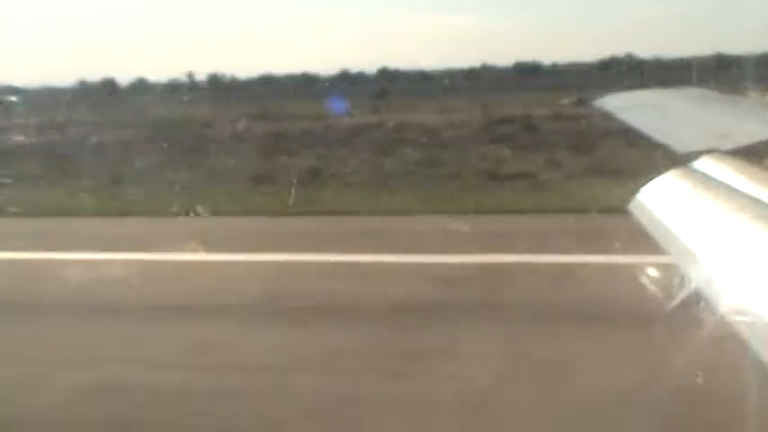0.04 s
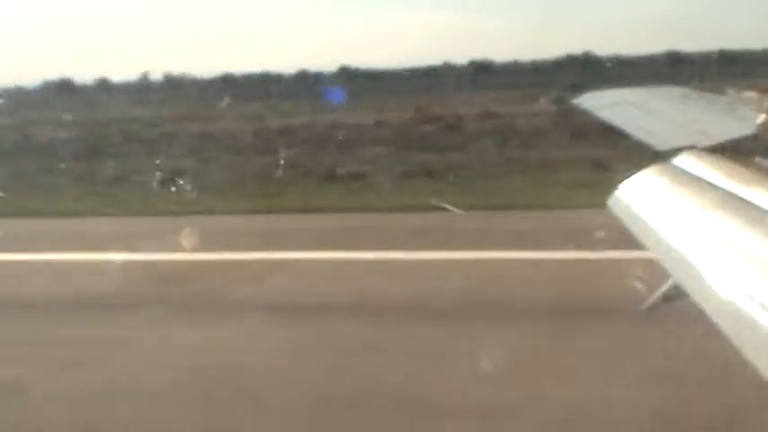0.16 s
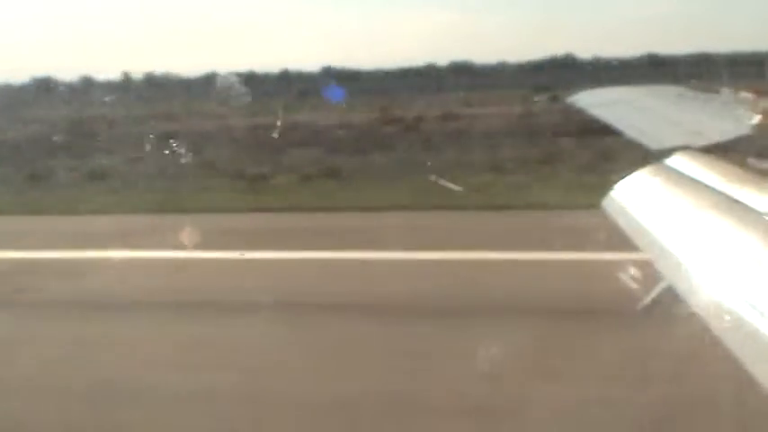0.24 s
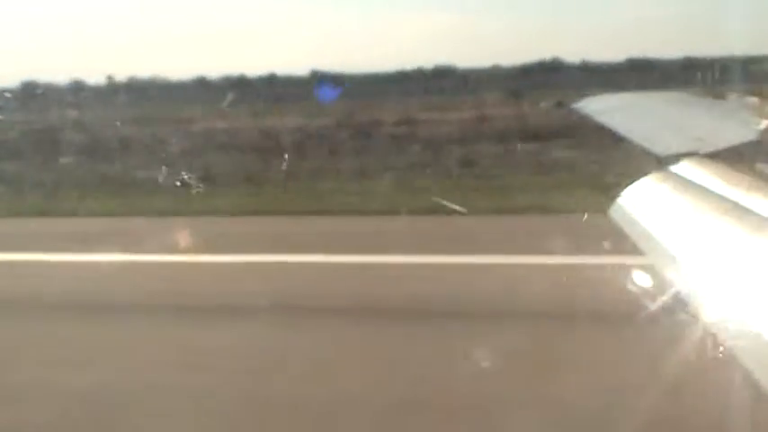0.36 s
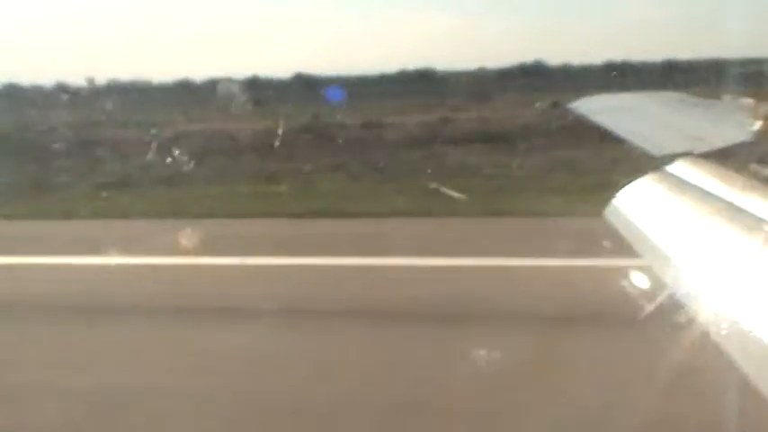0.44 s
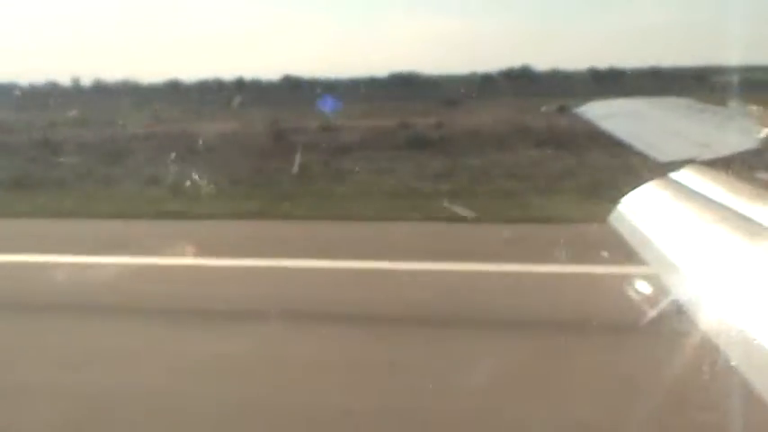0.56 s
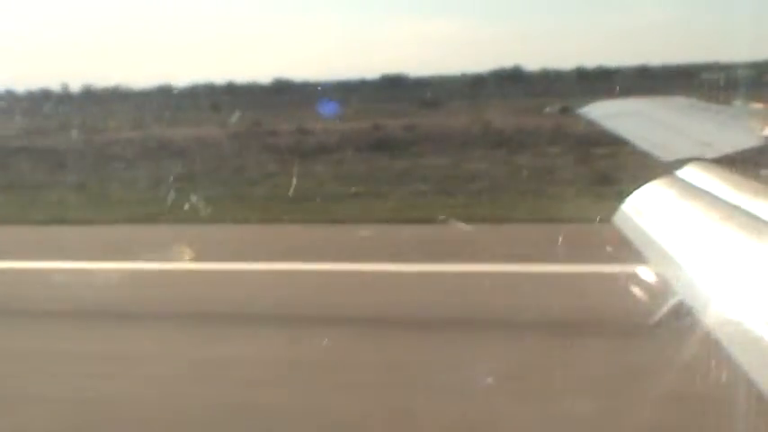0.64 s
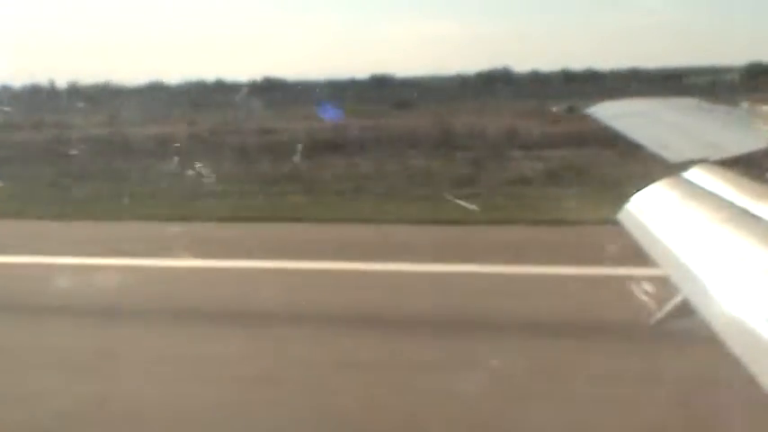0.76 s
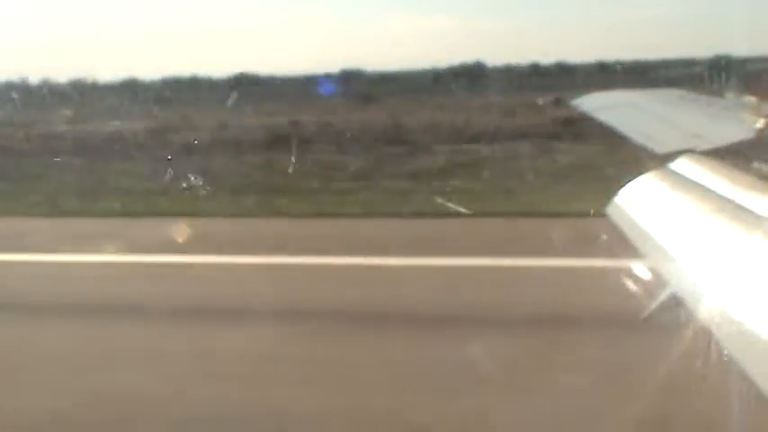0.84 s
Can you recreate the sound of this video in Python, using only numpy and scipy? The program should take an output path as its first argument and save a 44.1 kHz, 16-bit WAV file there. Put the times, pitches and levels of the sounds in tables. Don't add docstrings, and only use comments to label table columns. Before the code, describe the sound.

Aircraft cabin roar during the landing run, distorted and booming, with bumps and rattling trim

```python
import sys
import numpy as np
from scipy import signal
from scipy.fft import rfft, irfft
from scipy.io import wavfile
from scipy.ndimage import uniform_filter1d

SR = 44100
rng = np.random.default_rng(int(sys.argv[2]) if len(sys.argv) > 2 else 0)


def to_wav(s):
    ch = np.atleast_2d(s).T
    pcm = np.round(np.clip(ch, -1, 1) * 32767)
    wavfile.write(sys.argv[1], SR, pcm.astype(np.int16))


def ratio(d):
    e = np.asarray(d, float) / 20
    return 10 ** e


N = 144648

# start_s, level_db
ROLL = [
    (0, 2.5),
    (.4, 2),
    (.8, 1),
    (1.2, 0),
    (1.6, 1),
    (2.0, 1),
    (2.4, 0.5),
    (2.8, -0.5),
    (3.05, -2),
    (3.28, -4.5),
]
# pitch_hz, level_db (per Hz)
BOOM_COLOUR = [(25, -28), (50, -5), (130, -4.5), (260, -4.5), (420, -12.5), (800, -32.5), (1500, -44.5),
               (3000, -67)]
# pitch_hz, width_hz, boost_db
HULL_TONES = [(86.7, 20, 3.5), (167, 17, 3), (215.5, 30.4, 4.5), (314, 78, 0.9), (362.5, 11, 2),
              (850, 122, 11)]
# pitch_hz, level_db (per Hz)
HISS_COLOUR = [(300, 0), (1000, 1.5), (2000, -6.5), (3200, -14.5), (4700, -15.5), (7000, -23), (10000, -34),
               (16000, -57)]
# pitch_hz, likeness (0 to 1)
LIKENESS = [(60, 0.92), (250, 0.99), (500, 0.77), (1500, 0.88), (5000, 0.89), (12000, 0.3)]
# start_s, level_db (peak), pitch_hz
KNOCKS = [(0.0707, -21.5, 3680), (0.1974, -25, 3900), (0.213, -10.5, 3360), (0.403, -16.5, 3570),
          (0.5197, -10.5, 3320), (0.6224, -33, 3080), (0.7714, -20, 3550), (0.9276, -27, 3220),
          (0.9797, -23, 3500), (1.463, -29, 3140), (1.6576, -34, 3120), (1.8074, -35, 3170),
          (1.9308, -17.5, 5030), (2.0487, -23, 3260), (2.129, -37, 3000), (2.1794, -48, 3140),
          (2.2106, -41, 3160), (2.2714, -33, 3010), (2.398, -15.5, 3140), (2.441, -26, 3080),
          (2.5694, -35, 4540), (2.66, -32, 3100), (2.696, -34, 3070), (2.7514, -40, 3120),
          (3.205, -21, 3250)]
# low_cut_hz, turning_zero_hz, pole_hz, gain_db
PHASE_NETWORK = [
    (151, 185, 148, -4),
    (255, 423, 260, -2.5),
]
# start_s, level_db (peak)
BRIGHT_TICKS = [(0.2483, -43), (0.4015, -48), (0.5097, -42.5), (0.5494, -48), (0.622, -42), (0.9426, -42),
                (0.9896, -43.5), (1.125, -48), (1.6561, -46), (1.9294, -57), (2.121, -48), (2.176, -43.5),
                (2.2054, -45), (2.293, -45), (2.4394, -53.5), (2.5685, -43.5), (2.6539, -45),
                (2.699, -56.5), (2.7464, -47), (3.0285, -57)]
# start_s, shake_db, length_s
JOINTS = [(0.074, 4.5, 0.019), (0.134, 1, 0.013), (0.21, 2.5, 0.011), (0.409, 7.5, 0.013),
          (0.453, 3.5, 0.01), (0.523, 2, .02), (0.645, 6, .025), (0.773, 4, 0.011), (0.984, 5, 0.029),
          (1.112, 2.5, 0.013), (1.309, 3, .012), (1.38, 0, 0.018), (1.476, 5, .01), (1.668, 2.5, 0.03),
          (1.903, 4.5, 0.029), (2.274, 5.5, 0.021), (2.443, 2.5, 0.022), (2.504, 4.5, 0.023),
          (2.673, 6, 0.016), (2.821, 3.5, 0.011), (2.964, 2.5, 0.008), (3.038, 3.5, 0.01),
          (3.117, -0.5, .01), (3.174, 3, 0.0085), (3.209, 4.5, 0.028)]
# pitch_hz, level_db (per Hz)
SHAKE_COLOUR = [(300, -21), (700, -10), (1300, 3), (2500, -15.5), (5000, -20), (12000, -52.5)]
# start_s, level_db
DRONE_LEVEL = [(0, -20.5), (.3, -24), (.6, -20.5), (.9, -16), (1.1, -14), (1.3, -14.5), (1.55, -17.5),
               (1.85, -18), (2.15, -26), (2.47, -14.5), (2.75, -18), (3.05, -21.5), (3.28, -29)]
# start_s, level_db, pitch_hz
PANEL_RINGS = [(0.1, -20.5, 374), (0.11, -21, 324), (0.16, -27, 90.7), (0.21, -19.5, 211.8),
               (0.254, -23.5, 89), (0.299, -14.5, 240.5), (0.364, -17.5, 295.4), (0.399, -16.5, 215.3),
               (0.454, -22, 320), (0.554, -17.5, 311), (0.554, -19, 342), (0.624, -20, 224),
               (0.723, -17, 274), (0.798, -16, 212.6), (0.818, -21, 319), (0.888, -25, 174),
               (0.934, -26, 401.6), (0.964, -29, 346.5), (1.003, -16, 205.5), (1.083, -21, 220.7),
               (1.172, -19.5, 305), (1.222, -21.5, 322.6), (1.272, -17.5, 160.7), (1.312, -19.5, 224.3),
               (1.367, -15, 303.2), (1.396, -17.5, 208.6), (1.432, -19, 303.2), (1.502, -17.5, 202.7),
               (1.591, -21.5, 88), (1.651, -19.5, 214.3), (1.701, -20, 154.2), (1.791, -19, 219),
               (1.851, -17.5, 351.2), (2.029, -17.5, 212.7), (2.085, -15.5, 230.7), (2.109, -20.5, 160.7),
               (2.155, -21.5, 298.3), (2.175, -17.5, 223), (2.28, -18.5, 224), (2.3, -17, 290.5),
               (2.34, -20, 348), (2.37, -20, 230), (2.41, -23, 355), (2.465, -21, 313), (2.479, -17, 181.4),
               (2.539, -23, 353.5), (2.629, -22, 307.5), (2.739, -19.5, 183), (2.809, -20.5, 217.5),
               (2.879, -20.5, 325.6), (2.898, -22.5, 231.5), (2.983, -21.5, 241.6), (3.068, -23.5, 155),
               (3.128, -23, 279), (3.162, -23.5, 155), (3.203, -21.5, 304.4)]

HISS_FOLLOWS = 1.42


def evened(x):
    return x / np.sqrt(np.mean(x ** 2) + 1e-20)


def read(points, hz):
    pitch, value = np.transpose(points)
    return np.interp(np.log(hz + 1), np.log(pitch + 1), value)


def roll_db():
    return np.interp(np.arange(N) / SR, *np.transpose(ROLL))


def joint_db():
    t = np.arange(N) / SR
    return sum(db * np.exp(-((t - start) / length) ** 2) for start, db, length in JOINTS)


def drift(low_hz, top_hz):
    t = np.arange(0, N + 64, 64) / SR
    waver = 0
    for hz in np.geomspace(low_hz, top_hz, num=24):
        waver = waver + np.sin(2 * np.pi * (hz * t + rng.random())) / np.sqrt(hz)
    return np.interp(np.arange(N) / SR, t, evened(waver))


def pair(x, colour_db):
    hz = np.fft.rfftfreq(N, 1 / SR)
    a, b = rfft(x) * ratio(colour_db(hz))
    angle = np.arccos(np.clip(read(LIKENESS, hz), 0, 1)) / 2
    shared, own = a * np.cos(angle), b * np.sin(angle)
    return evened(irfft([shared + own, shared - own], N))


def faint_hiss():
    noise = ratio(-74 + HISS_FOLLOWS * roll_db()) * rng.standard_normal((2, N))
    band = signal.butter(2, [6100, 12200], "band", fs=SR, output="sos")
    return signal.sosfilt(band, noise[0] + 0.12 * noise)


def bright_ticks():
    decay_s, level_db, width = 0.0023, -2.5, 0.9
    t = np.arange(1000) / SR
    out = np.zeros((2, N + len(t)))
    for start, db in BRIGHT_TICKS:
        middle, left, right = rng.standard_normal((3, len(t)))
        tick = np.exp(-t / decay_s) * (middle + width * np.array([left, right]))
        out[:, round(start * SR):][:, :len(t)] += ratio(db + level_db) * tick
    high = signal.butter(2, 9000, "high", fs=SR, output="sos")
    return signal.sosfilt(high, out[:, :N])


def hiss():
    level_db = -31.5 + HISS_FOLLOWS * roll_db() + 0.32 * drift(4.3, 28)
    return ratio(level_db) * pair(rng.standard_normal((2, N)), lambda hz: read(HISS_COLOUR, hz))


def buzz():
    ticks_per_s, decay_s = 830, 0.00056
    sizes = ratio(1.4 * np.minimum(rng.exponential(1, N), 2))
    ticks = sizes * (rng.random(N) < ticks_per_s / SR)
    t = np.arange(400) / SR
    envelope = signal.oaconvolve(ticks, np.exp(-t / decay_s))[:N]
    shaken = envelope * rng.standard_normal((2, N))
    level_db = -42.5 + HISS_FOLLOWS * roll_db()
    return ratio(level_db) * pair(shaken, lambda hz: 0.55 * read(HISS_COLOUR, hz))


def joints():
    swell = ratio(2 * joint_db()) - 1
    return ratio(-35.5) * swell * pair(rng.standard_normal((2, N)), lambda hz: read(SHAKE_COLOUR, hz))


def knocks():
    rise_s, decay_s, level_db = 0.0016, 0.0073, -15
    t = np.arange(2000) / SR
    out = np.zeros((2, N + len(t)))
    shape = (1 - np.exp(-t / rise_s)) * np.exp(-t / decay_s)
    for start, db, hz in KNOCKS:
        middle, left, right = rng.standard_normal((3, len(t)))
        radius = np.exp(-np.pi * 0.6 * hz / SR)
        resonance = [1, -2 * radius * np.cos(2 * np.pi * hz / SR), radius * radius]
        ring = [signal.lfilter([1], resonance, middle + 0.5 * side) for side in (left, right)]
        out[:, round(start * SR):][:, :len(t)] += ratio(db + level_db) * shape * evened(np.array(ring))
    return out[:, :N]


def rings():
    length_s, level_db, tilt_db_per_octave, sway_rad = 0.03, 13, -3.5, 0.2
    t = np.arange(-4000, 4000) / SR
    out = np.zeros((2, N + 8000))
    for start, db, hz in PANEL_RINGS:
        turn, sway = rng.random(2)
        side_shift = sway_rad * (sway - 0.5) * np.array([[1], [-1]])
        tone = np.sin(2 * np.pi * (hz * t + turn) + side_shift)
        size = ratio(db + level_db + tilt_db_per_octave * np.log2(hz / 220))
        out[:, round(start * SR):][:, :len(t)] += size * np.exp(-(t / length_s) ** 2) * tone
    return out[:, 4000:N + 4000]


def drone():
    pitch_hz, width_hz = 324, 63
    level_db = np.interp(np.arange(N) / SR, *np.transpose(DRONE_LEVEL))

    def colour(hz):
        return -20 * np.log10(1 + (2 * (hz - pitch_hz) / width_hz) ** 2)
    return ratio(level_db) * pair(rng.standard_normal((2, N)), colour)


def boom():
    def colour(hz):
        peaks = sum(db / (1 + (2 * (hz - pitch) / width) ** 2) for pitch, width, db in HULL_TONES)
        return read(BOOM_COLOUR, hz) + peaks
    level_db = -7 + roll_db() + 0.051 * drift(2.1, 7.7)
    return ratio(level_db) * pair(rng.standard_normal((2, N)), colour)


def scene():
    even_s, even_share, joint_drive = 0.02, 0.4, 0.36
    low = boom() + drone() + rings()
    power = (low ** 2).mean(0)
    swell = uniform_filter1d(power, round(even_s * SR)) / uniform_filter1d(power, size=20000)
    low = ratio(joint_drive * joint_db()) * low * abs(swell) ** (-even_share / 2)
    high = hiss() + buzz() + knocks() + joints()
    return low + ratio([[-1.5], [0]]) * high


def top_cut(x):
    return signal.sosfilt(signal.butter(12, 15730, fs=SR, output="sos"), x)


def record(dry):
    clip, top_hz, narrow_hz, crossfeed = 0.46, 11700, 7000, 0.11
    start_s, fade_s = 0.042, 0.024
    cut = rfft(np.clip(dry, -clip, clip))
    hz = np.fft.rfftfreq(N, 1 / SR)
    s = 1j * hz
    low, zero, pole, gain_db = np.transpose(PHASE_NETWORK)[:, :, None]
    low_cut = s / (s + low)
    phase_turn = (zero - s) / (pole + s)
    dull = 1 / (1 + (hz / top_hz) ** 5) ** 0.5
    sides = cut * ratio(gain_db) * low_cut * phase_turn * dull
    share = crossfeed + 0.5 / (1 + (narrow_hz / (hz + 1)) ** 4)
    sides = irfft((sides + share * sides[::-1]) / (1 + share), N)
    sides = sides + faint_hiss() + bright_ticks()
    fade = np.clip((np.arange(N) / SR - start_s) / fade_s, 0, 1) ** 0.83
    return top_cut(fade * sides)


dry = scene()
out = record(dry)
to_wav(out)
```